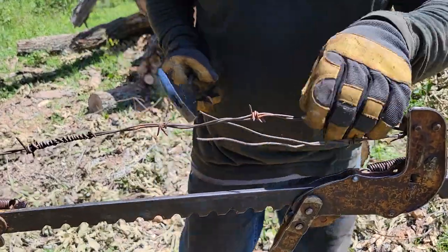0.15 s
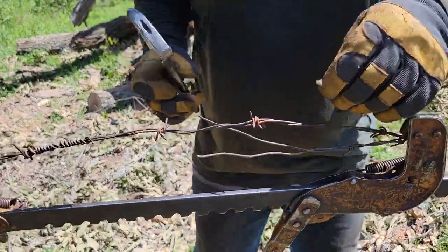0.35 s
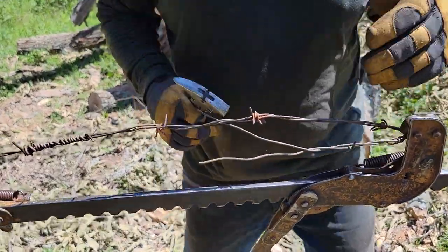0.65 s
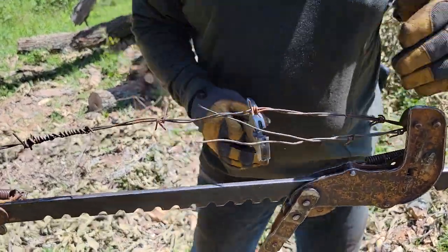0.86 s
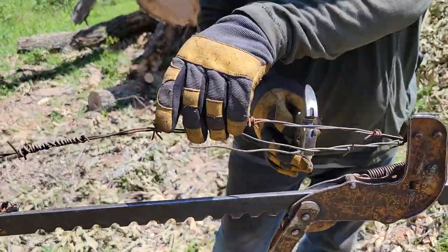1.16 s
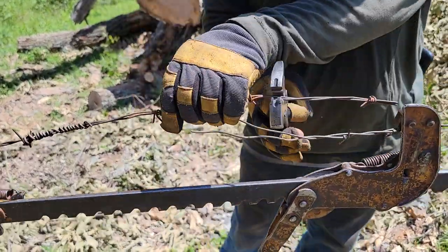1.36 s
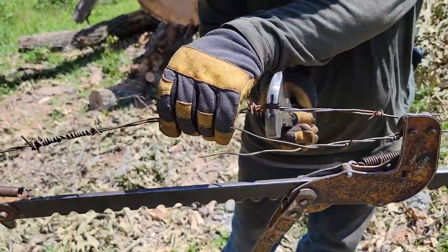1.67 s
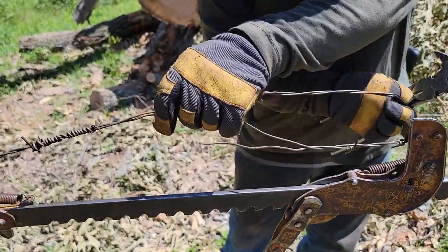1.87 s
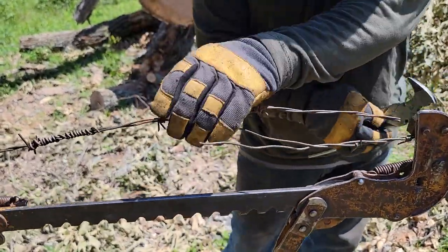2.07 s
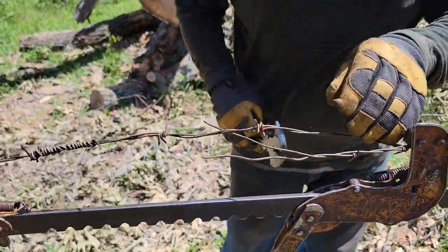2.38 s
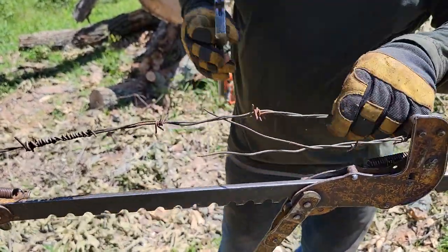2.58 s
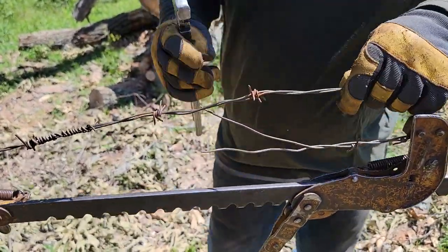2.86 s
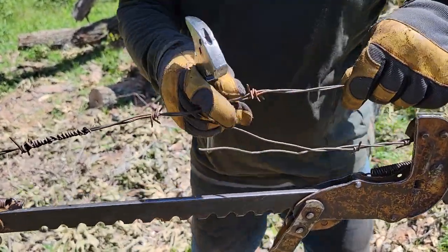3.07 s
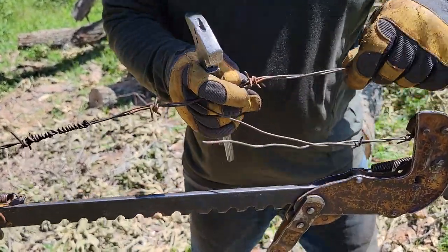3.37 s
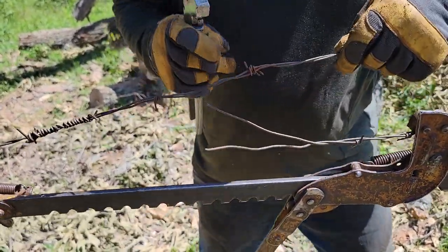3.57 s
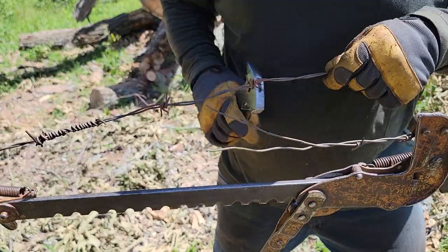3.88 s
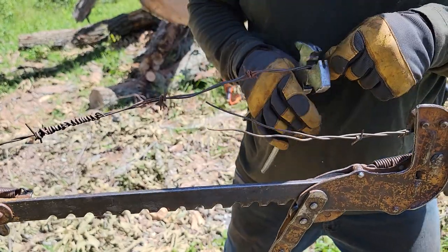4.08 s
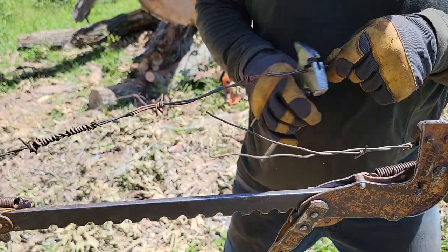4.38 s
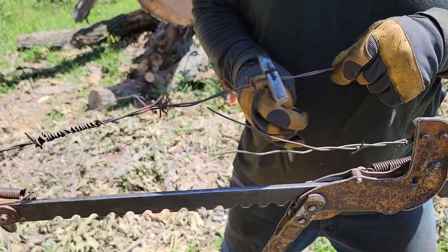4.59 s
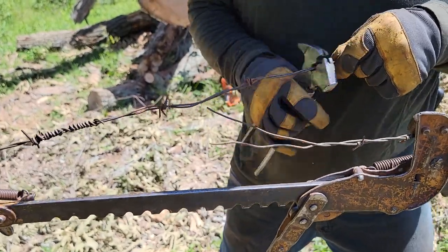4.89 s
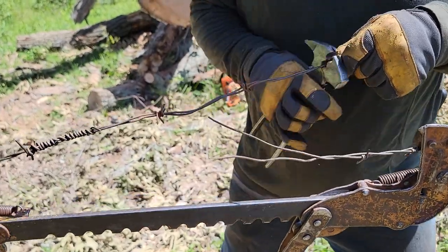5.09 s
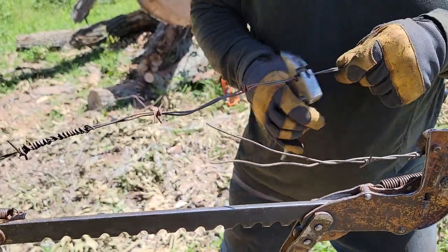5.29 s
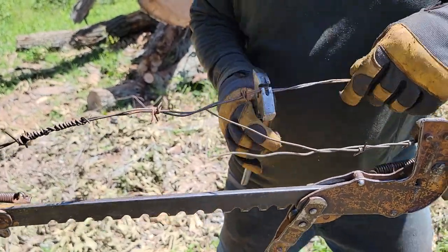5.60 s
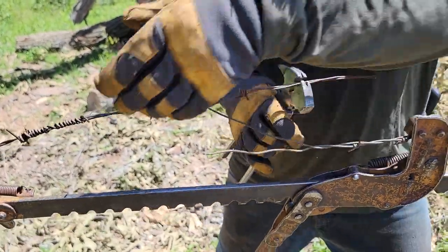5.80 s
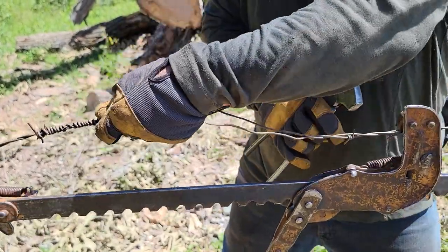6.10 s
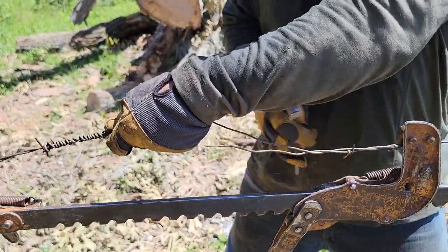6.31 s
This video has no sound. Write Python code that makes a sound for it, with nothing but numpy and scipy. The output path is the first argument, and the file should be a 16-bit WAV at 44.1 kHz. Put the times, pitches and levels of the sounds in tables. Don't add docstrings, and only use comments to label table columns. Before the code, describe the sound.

Wind buffets a phone microphone outdoors while steel pliers clink, click and scrape on barbed wire, building to a run of sharp spaced knocks.

```python
import sys
import numpy as np
from scipy import signal
from scipy.fft import rfft, irfft, next_fast_len
from scipy.io import wavfile

SR = 44100
rng = np.random.default_rng(int(sys.argv[2]) if len(sys.argv) > 2 else 0)


def invert_db(level):
    return 10 ** (np.asarray(level, dtype=float) / 20)


def bounce(signal):
    frames = np.transpose(np.atleast_2d(signal))
    limited = np.clip(frames, -1, 1)
    pcm = np.round(limited * 32767).astype(np.int16)
    wavfile.write(sys.argv[1], SR, pcm)


N = 284445
SIDES = np.array([[1], [-1]])

# time in seconds, rumble level in dB.
BREEZE_DB = [
    (0.0, -33),
    (0.55, -34),
    (0.9, -34),
    (1.35, -33),
    (1.95, -44),
    (3.25, -42.5),
    (4.05, -53),
    (4.7, -45),
    (6.45, -44),
]
# peak in seconds, rumble in dB, fade in seconds per 20 dB, sharpness in dB,
# left minus right in dB.
PUFFS = [(2.05, -31, .14, 1.5, -5), (2.19, -31, .2, 6, -5), (2.6, -34, .22, 1.5, -4),
         (2.82, -35, .12, -1.5, 4), (3.0, -33, .25, -4, 9), (3.87, -43, .2, -3, -1.5),
         (4.21, -42, .15, -4, 7), (4.46, -37, .14, -3, 5), (4.8, -29, .18, 2.5, -1.5),
         (4.99, -34, .13, -1.5, 1.5), (5.06, -32, .11, 1.5, -7), (5.44, -30, .14, 1.5, -3),
         (5.56, -29, .1, 7.5, -3.5), (5.7, -37, .2, 5, -2.5), (5.89, -29, .09, 4, -5),
         (6.0, -27.5, .11, -7, -9), (6.24, -29.5, .2, 2.5, -2.5), (6.44, -29, .14, -6, 1.5)]
# time in seconds, force in dB.
GUST_DB = [
    (0.0, -32),
    (0.07, -28),
    (0.64, -27),
    (0.69, -35),
    (0.79, -29),
    (1.05, -29),
    (1.35, -35),
    (1.65, -40),
    (1.9, -55),
]
# peak in seconds, level in dB.
SLAPS = [
    (.19, -26),
    (.322, -27),
    (.378, -22.5),
    (.5, -29),
    (.62, -31.5),
    (.69, -31),
    (.79, -36),
    (1.126, -36),
    (1.266, -39),
    (1.402, -40.5),
]
# frequency in Hz, density in dB per Hz.
RUMBLE_SPECTRUM = [(12, -40), (20, -16), (48, -1), (70, 4.5), (99, -0.5), (182, -19), (265, -26),
                   (300, -48.5), (390, -40), (660, -120)]
# frequency in Hz, density in dB per Hz.
BUFFET_SPECTRUM = [(59, -28), (100, -9), (151, -2.5), (330, -13), (430, -36.5), (730, -120)]
# frequency in Hz, density in dB per Hz.
WHIP_SPECTRUM = [(160, -24), (280, -2.5), (461, -4), (724, -16), (795, -18.5), (1500, -36), (1800, -42),
                 (2340, -66), (3960, -120)]
# frequency in Hz, density in dB per Hz.
LEAVES_SPECTRUM = [(120, -31), (200, -11), (347, 1), (500, -5), (709, -5), (867, -9), (1140, -10.5),
                   (1560, -12), (4430, -13.5), (6880, -17.5), (10700, -30.5), (15100, -30), (16000, -51)]
# time in seconds, level in dB.
RUB_DB = [(0.0, -52), (0.3, -58), (0.65, -56), (1.49, -59), (1.62, -37), (1.72, -53), (1.88, -39),
          (1.98, -53), (2.1, -59), (4.25, -60), (4.41, -44), (4.56, -44), (4.74, -34.5), (5.2, -38),
          (5.6, -44), (5.8, -54), (6.29, -52), (6.45, -42)]
# frequency in Hz, density in dB per Hz.
GLOVE_SPECTRUM = [(530, -27), (900, -7.5), (1190, -12), (1260, -11), (1900, -6.5), (3100, -5), (5630, -5),
                  (11000, -19.5), (14300, -26), (22000, -120)]
# frequency in Hz, width in Hz, gain in dB.
JAW_MODES = [(1275, 90, 1.5), (1655, 60, 2.5), (3400, 162, 1), (4100, 150, 0.5), (4715, 90, -1.5),
             (5430, 90, -1.5), (6580, 70, -1.5), (6840, 110, 2.5), (7710, 77, -11)]
# start in seconds, peak in dB, handle modes in dB,
# head modes in dB, freedom to ring as a ratio 0-2.
CLINKS = [(.405, -33, 23, -8, 1), (.4229, -25.5, 18, -5, 0.87), (0.4372, -21, 14, -1, 0.88),
          (.7262, -30.5, 3, -9, .6), (1.8053, -7.5, 17, -7, 0.45), (1.8134, -8, 17, -8, 0.55),
          (2.74, -33.5, 9, -6, 0.91), (2.7968, -27.5, 20, 1.5, 1.2), (2.814, -2.5, 7, 5.5, 0.62),
          (2.8294, -17, 10, 2, 0.61), (2.8449, -13, 16, -2, 0.25), (2.8564, -23, 18, -3, 0.5),
          (2.862, -24, 12, -1, .4)]
# frequency in Hz, level in dB, t60 in seconds.
PLIER_MODES = [(1670, -36, 0.082), (3400, -19.5, 0.08), (3530, -13, 0.05), (4450, -25, 0.065),
               (4800, -18, .04), (5430, 2, 0.07), (6100, -9, .06), (6815, -4, 0.06), (7995, 0.5, 0.09),
               (9300, -18, 0.045), (10702, -13, 0.14), (10909, -17, 0.09), (12890, -15, 0.06),
               (14137, -16, .09)]
# start in seconds, hold in seconds, level in dB.
BRUSHES = [
    (.8, .08, -50.5),
    (1.25, .04, -49),
    (1.335, .06, -39.5),
    (1.575, .02, -43),
    (2.31, .04, -47),
    (2.93, .07, -55),
    (3.33, .05, -42.5),
    (3.42, .025, -40),
]
# frequency in Hz, density in dB per Hz.
LEATHER_SPECTRUM = [(500, -20), (1300, -9), (2100, -1), (3000, -3), (5600, -2), (7500, -7), (10000, -15),
                    (12500, -5), (15500, -9), (18000, -60)]
# start in seconds, peak in dB, rebound in seconds, rebound peak in dB,
# edge in dB.
BLOWS = [
    (1.6217, -6.5, 1.6324, -16.5, 1.5),
    (1.8955, -11, 1.908, -17, 5),
    (4.3778, -5, 4.3945, -7, -.6),
    (4.6383, -5, 4.651, -22, 2.5),
    (4.8531, -4.5, 4.863, -8, -1.5),
    (5.0713, -4, 5.0894, -16.5, -1.5),
    (5.2927, -3.5, 5.3025, -8.5, -3),
    (5.521, -6, 5.528, -11.5, -3.5),
    (6.322, -8.5, 6.339, -17, -3),
]
# start in seconds, peak in dB, weight in dB.
TICKS = [(1.481, -35, -6), (1.527, -27.5, -18), (2.745, -33, -20), (4.215, -35, -12), (4.245, -35, -12),
         (1.8045, -14.5, -24.5), (1.9813, -29, -18), (2.328, -29, -21), (3.6237, -41, -17),
         (4.0023, -38, -11.5), (4.563, -20.5, -12), (4.8824, -11.5, -21.5), (5.7159, -30.5, -18),
         (5.7565, -18.5, -30), (5.8405, -31, -16), (6.0327, -39, -16), (6.1662, -20, -15.5)]
# start in seconds, peak in dB, weight in dB.
SKIDS = [(1.6033, -13.5, -16.5), (1.6535, -20.5, -10), (1.3067, -27, -19), (1.7564, -31, -18),
         (1.317, -31, -18), (1.336, -30, -16), (2.3176, -30, -12), (2.4369, -34, -18), (3.4864, -38, -8),
         (4.118, -37, -9.5), (4.179, -32.5, -11), (4.3385, -32, -17), (4.355, -32, -14), (4.537, -33, -14),
         (4.609, -30, -14), (4.99, -27, -14), (5.053, -28, -14), (5.448, -31, -14), (5.506, -25, -12),
         (4.37, -21, -8.5), (4.631, -16, -8), (4.6894, -19.5, -13.5), (4.9581, -22, -11),
         (5.2619, -38, -16), (5.319, -16, -25), (5.382, -22.5, -17), (5.408, -21.5, -13.5),
         (5.494, -28, -11), (5.559, -19.5, -17), (5.6086, -28, -17), (5.913, -34, -19), (6.0577, -26, -13),
         (6.2895, -18.5, -14.5)]
# dull part in dB, bright part in dB, rise in seconds, t60 in seconds.
BLOW_KIND = (-16, -15.5, .0021, .068)
REBOUND_KIND = (-15, -20.5, .0028, .075)
TICK_KIND = (0.1, -24, .002, .062)
SKID_KIND = (0.1, -13.5, .0025, .083)
# frequency in Hz, density in dB per Hz.
SCRAPE_SPECTRUM = [(180, -54), (300, -2), (565, -16.5), (787, -7), (978, -11.5), (1690, -4), (1900, -2.5),
                   (2480, -7.5), (3460, -2.5), (5080, -4), (6740, -4), (9880, -16.5), (12900, 7),
                   (16000, -11.5)]
# start in seconds, peak in dB, pitch in Hz, t60 in seconds.
PINGS = [(1.352, -33, 4450, .07), (1.345, -31, 6100, .03), (2.8162, -9, 4250, .022),
         (2.8165, -9, 5430, .06), (2.823, -20, 9400, .04), (2.8455, -9, 4000, .012),
         (2.851, -22, 4500, .03), (3.338, -35, 2100, .04), (3.416, -33, 2250, .05), (3.36, -36, 5600, .03),
         (1.5274, -28, 4470, 0.05), (1.9804, -28, 6890, 0.045), (2.2777, -34, 6310, 0.05),
         (2.3007, -33, 6900, 0.042), (2.3196, -23.5, 6320, 0.076), (2.3394, -34, 6400, 0.05),
         (2.4369, -29, 6270, 0.068), (2.443, -30, 5300, .05), (4.0018, -35, 3560, 0.078),
         (4.1175, -32, 3620, 0.067), (4.563, -18, 4150, 0.042), (5.3812, -21, 3380, 0.05),
         (5.7164, -32, 3670, 0.05), (5.7578, -23, 3270, 0.036), (5.8421, -32, 4160, 0.05),
         (5.913, -35, 4250, 0.05), (6.0327, -30, 6860, 0.05), (6.1669, -26, 5430, 0.05)]
# start in seconds, peak in
# dB, pitch in Hz, t60 in seconds.
KNOCKS = [(1.482, -29, 1900, .008), (1.657, -11, 2100, 0.007), (1.658, -20, 800, .01),
          (5.553, -15, 120, .035), (1.897, -21, 1670, .02), (3.119, -34, 1800, .015),
          (5.358, -30, 1640, 0.067), (4.537, -33, 900, .012), (6.291, -32, 1000, .015),
          (6.32, -22, 805, .02), (6.322, -19, 1150, .025)]
# start in seconds, peak in dB.
SNAPS = [
    (1.6572, -10.5),
    (4.5635, -24),
    (5.2935, -13),
    (1.6235, -15),
    (5.522, -15),
]
# start in seconds, peak in dB, pitch in Hz.
CHATTER_LOW = [(4.361, -35, 1130), (4.371, -24, 1030), (4.377, -22, 1660), (4.543, -32, 1180),
               (4.562, -36, 1670), (4.634, -22, 1780), (4.691, -30, 1310), (4.778, -32, 1680),
               (4.848, -23, 834), (4.853, -19, 1640), (4.957, -31, 1180), (4.995, -35, 1650),
               (5.053, -42, 751), (5.053, -25, 1330), (5.053, -27, 1280), (5.075, -23, 1690),
               (5.079, -22, 1720), (5.11, -28, 1660), (5.174, -33, 1210), (5.276, -27, 1650),
               (5.292, -24, 1670), (5.409, -33, 770), (5.447, -41, 1660), (5.505, -35, 751),
               (5.506, -29, 1060), (5.521, -27, 1280), (5.61, -38, 1280), (5.757, -37, 1670)]
CHATTER_MID = [(4.3808, -15, 3820), (4.3808, -15, 4400), (4.4771, -36, 3610), (4.5634, -21, 4250),
               (4.6398, -14, 4690), (4.6398, -12, 3500), (4.7965, -31, 3400), (4.8488, -19, 3760),
               (4.8528, -13, 3540), (4.9686, -24, 4240), (5.0369, -29, 4110), (5.0713, -13, 4380),
               (5.0753, -12, 4720), (5.1591, -28, 4160), (5.213, -33, 4480), (5.2619, -31, 3570),
               (5.2928, -8, 3400), (5.3836, -24, 3480), (5.449, -33, 4020), (5.4914, -27, 4380),
               (5.5223, -14, 3330), (5.5278, -12, 3410), (5.6081, -32, 3900), (5.7164, -35, 3570),
               (5.7578, -20, 3330)]
CHATTER_HIGH = [(4.3788, -10, 5630), (4.5629, -27, 6300), (4.6388, -18, 6120), (4.6388, -14, 6710),
                (4.8508, -14, 6160), (4.8548, -8, 5540), (4.9586, -27, 6320), (5.0499, -19, 6970),
                (5.0713, -13, 5420), (5.0758, -11, 6680), (5.224, -29, 6360), (5.2928, -8, 6870),
                (5.3612, -33, 6260), (5.3811, -27, 6190), (5.4475, -33, 5430), (5.5218, -12, 6500),
                (5.7578, -24, 5430), (5.8037, -41, 6600), (5.8426, -34, 6540), (5.9129, -39, 6560),
                (6.0326, -34, 7040), (6.0326, -33, 6840), (6.0586, -33, 7400), (6.1085, -41, 5710)]
CHATTER_T60_S = .03, .022, .018
# frequency in Hz, gain in dB.
INLET_RESPONSE = [(1900, 0.5), (2500, -0.5), (3300, -0.5), (7000, -0.5), (8100, 1), (10300, -3),
                  (11800, 0.5)]
# frequency in Hz, left minus right in dB.
PORT_SHADING = [(60, 17), (110, 13), (200, 19), (380, -9), (700, -19.5), (1290, -5), (2380, -1),
                (4400, -9.5), (8120, -4), (15000, 5.5)]


def unit(x):
    return x / np.sqrt(np.mean(x ** 2))


def on_log_axis(table, hz):
    f, db = np.transpose(table)
    return np.interp(np.log(hz + 1), np.log(f + 1), db)


def colour(x, table, tilt=1):
    hz = np.arange(4097) * SR / 8192
    cepstrum = irfft(np.log(invert_db(tilt * on_log_axis(table, hz))))
    cepstrum[1:4096] *= 2
    cepstrum[4097:] = 0
    impulse = irfft(np.exp(rfft(cepstrum)))[:4096]
    size = next_fast_len(N + 4096)
    return irfft(rfft(x, size) * rfft(impulse, size), size)[:, :N]


def band(x, lo_hz, hi_hz):
    sos = signal.butter(2, [lo_hz, hi_hz], "bandpass", fs=SR, output="sos")
    return signal.sosfilt(sos, x)


def ring(x, hz, width_hz):
    return signal.lfilter(*signal.iirpeak(hz, hz / width_hz, fs=SR), x)


def walk(rate_hz, channels=1):
    knots = rng.standard_normal((channels, 6000))
    position = np.arange(N) * (rate_hz / SR)
    return np.array([np.interp(position, np.arange(6000), row) for row in knots])


def amp_walk(db, rate_hz, channels=1):
    return np.exp(db * np.log(10) / 20 * walk(rate_hz, channels))


def pair(alike, lag_s, grain_db=0):
    left, other = rng.standard_normal((2, N)) * amp_walk(grain_db, 900, channels=2)
    share = np.clip(alike, -1, 1)
    right = np.roll(share * left, int(lag_s * SR)) + np.sqrt(1 - share ** 2) * other
    return unit(np.array([left, right]))


def curves(table, silent_db=None):
    s, *columns = np.transpose(table)
    return np.array([np.interp(np.arange(N) / SR, s, c, silent_db, silent_db) for c in columns])


def swell(s, db, rise_s, fall_s, hold_s=0):
    t = np.arange(N) / SR - s
    away = np.maximum(-t / rise_s, (t - hold_s) / fall_s)
    return db - 20 * np.maximum(away, 0)


def power_sum(gains):
    return np.sqrt(sum(g ** 2 for g in gains))


def notes(table, db_offset):
    out = np.zeros((2, N + SR))
    for s, db, hz, t60_s in table:
        i = int(s * SR)
        t = np.arange(int(abs(t60_s) * SR)) / SR
        envelope = invert_db(db + db_offset - 60 * t / t60_s) * (1 - np.exp(-t / .0003))
        out[:, i:i + len(t)] += envelope * np.sin(2 * np.pi * hz * (t + .00005 * SIDES))
    return out[:, :N]


def buffet_level(rumble_db):
    return -46 + 1.3 * (rumble_db + 35)


def wind():
    breeze_db, gust_db = curves(BREEZE_DB)[0], curves(GUST_DB, -99)[0]
    push = [invert_db(breeze_db)]
    shake = [invert_db(buffet_level(breeze_db)), invert_db(gust_db)]
    for s, db, fade_s, sharp_db, pan_db in PUFFS:
        puff_db = swell(s, db, fade_s, fade_s)
        side_db = pan_db * SIDES / 2
        push.append(invert_db(puff_db) * invert_db(side_db))
        shake.append(invert_db(buffet_level(puff_db)) * invert_db(sharp_db + side_db))
    lash = [invert_db(gust_db - 5 - 8 * np.arange(N) / SR)]
    lash += [invert_db(swell(s, db, rise_s=.06, fall_s=.06)) for s, db in SLAPS]

    pressure = unit(colour(pair(alike=-0.041, lag_s=0), RUMBLE_SPECTRUM))
    rumble = pressure * power_sum(push) * invert_db(3.0) * amp_walk(2.5, 12, channels=2)
    eddies = pair(alike=-0.55, lag_s=0) * amp_walk(3.4, 90)
    shaking = unit(colour(eddies + .3 * eddies.sum(axis=0), BUFFET_SPECTRUM))
    whip = unit(colour(eddies, WHIP_SPECTRUM))
    return rumble + shaking * power_sum(shake) * invert_db(2.5) + whip * power_sum(lash) * invert_db(7.0)


def leaves():
    hiss = unit(colour(pair(alike=0.033, lag_s=0), LEAVES_SPECTRUM))
    return hiss * invert_db(-49) * amp_walk(0.95, 3.045, channels=2)


def rubbing():
    rub_db = curves(RUB_DB)[0]
    sizzle = invert_db(-50 + 1.2 * (rub_db + 40))
    snag_size = invert_db(13.5 + 3.7 * np.minimum(rng.exponential(size=N), 2.5))
    snags = (rng.random(N) < 400 / SR) * snag_size
    grains = pair(alike=0.33, lag_s=.00015, grain_db=1.0) + np.array([snags, np.roll(snags, 5)])
    wire = colour(grains, GLOVE_SPECTRUM)
    registers_hz = (800, 1350, 2300, 3900, 6600, 11000)
    patches = unit(sum(band(wire, hz / 1.3, hz * 1.3) * amp_walk(2.2, 50) for hz in registers_hz))
    top = unit(band(grains, 12400, 19800))
    return amp_walk(2.8, 40) * (invert_db(rub_db - .7) * patches + invert_db(2.1) * sizzle * top)


def jaw_ringing(hits, rub):
    drive = invert_db(-3.5) * hits + invert_db(2.5) * rub
    return sum(invert_db(db) * ring(drive * amp_walk(4.0, 30), hz, width_hz) for hz, width_hz, db in JAW_MODES)


def grit(count=500):
    when, which = rng.random((count, 2)).T
    detune, size = rng.standard_normal((count, 2)).T
    s = when * (N / SR)
    mode_hz = np.array(JAW_MODES)[(which * len(JAW_MODES)).astype(int), 0]
    hz = mode_hz * (1 + .05 * detune)
    db = np.interp(s, *np.transpose(RUB_DB)) + 3.5 * size
    return notes(zip(s, db, hz, np.full(count, .022)), db_offset=2.5)


def clinks():
    out = np.zeros((2, N))
    hz, mode_db, t60_s = (c[:, None] for c in np.transpose(PLIER_MODES))
    t = np.arange(SR // 8) / SR
    chance = rng.standard_normal((len(CLINKS), 3, 2, len(PLIER_MODES), 1))
    cracks = band(rng.standard_normal((len(CLINKS), 2, len(t))), 3100, 9400) * invert_db(-60 * t / 0.036)
    for row, (size, phase, detune), crack in zip(CLINKS, chance, cracks):
        s, db, handle_db, head_db, free = row
        turn = 2 * phase[0] + 1.3 * detune[1] * SIDES[:, None]
        tones = np.sin(2 * np.pi * hz * (1 + 0.0015 * detune[0]) * t + turn)
        share_db = mode_db + handle_db * (hz < 4500) + head_db * (hz > 7500) + 2.7 * size
        decay_s = np.clip(np.where(hz > 10000, .7, free) * t60_s, .01, .15)
        steel = np.sum(invert_db(share_db - 60 * t / decay_s) * tones, axis=1)
        knock = invert_db(-7.5) * steel + invert_db(-6 + .3 * head_db) * crack
        i = int(s * SR)
        out[:, i:i + len(t)] += invert_db(db) * (1 - np.exp(-t / 0.00033)) * knock
    return out * amp_walk(2.6, 250)


def brushing():
    level = sum(invert_db(swell(s, db, rise_s=.09, fall_s=.07, hold_s=hold_s)) for s, hold_s, db in BRUSHES)
    grains = pair(alike=.4, lag_s=.00012, grain_db=4.0)
    return level * amp_walk(3.0, 90) * unit(colour(grains, LEATHER_SPECTRUM))


def contacts():
    rows = []
    for s, db, again_s, again_db, edge_db in BLOWS:
        for when_s, peak_db, kind in ((s, db, BLOW_KIND), (again_s, again_db, REBOUND_KIND)):
            dull_db, bright_db, *times_s = kind
            rows.append((when_s, peak_db, dull_db, bright_db + edge_db, *times_s))
    for table, (dull_db, *rest) in ((TICKS, TICK_KIND), (SKIDS, SKID_KIND)):
        rows += [(s, db, dull_db + weight_db, *rest) for s, db, weight_db in table]
    return rows


def scrapes():
    slips = pair(alike=0.45, lag_s=.00012, grain_db=3.5)
    power = np.zeros((3, N + SR))
    t = np.arange(-SR // 50, SR // 6) / SR
    for s, db, dull_db, bright_db, rise_s, t60_s in contacts():
        i = int((s + .0015 + t[0]) * SR)
        fade = np.where(t < 0, np.exp(t / max(rise_s, .0001)), invert_db(-60 * t / max(t60_s, .01)))
        part_db = db + np.array([[dull_db], [0], [bright_db]])
        power[:, i:i + len(t)] += (invert_db(part_db) * fade) ** 2
    dull, body, bright = np.sqrt(power[:, :N])
    wire = colour(slips, SCRAPE_SPECTRUM)
    low = invert_db(-6.5) * dull * unit(band(wire, 400, 2320))
    middle = invert_db(-8.5) * body * unit(band(band(wire, 2700, 7600), 2600, 8000))
    high = invert_db(4.0) * bright * unit(band(band(slips, 9900, 18000), 8200, 22000))
    return low + middle + high


def pings():
    return notes(PINGS, db_offset=-4.5)


def knocks():
    return notes(KNOCKS, db_offset=-2.5)


def snaps():
    push = np.zeros(N)
    t = np.arange(SR // 100) / SR
    for (s, db), noise in zip(SNAPS, rng.standard_normal((len(SNAPS), len(t)))):
        i = int(s * SR)
        push[i:i + len(t)] += invert_db(db + 3.5 - 60 * t / .006) * noise
    return band(np.array([push, np.roll(push, 4)]), 600, 4500)


def chatter():
    rows = []
    for table, t60_s in zip((CHATTER_LOW, CHATTER_MID, CHATTER_HIGH), CHATTER_T60_S):
        rows += [(*row, t60_s) for row in table]
    return notes(rows, db_offset=-4.5)


def scene():
    hits, rub = scrapes(), rubbing()
    contact = hits + rub + jaw_ringing(hits, rub) + brushing() + snaps()
    hands = colour(contact, INLET_RESPONSE)
    hands = hands + grit() + chatter() + clinks() + pings() + knocks()
    left = colour(hands[:1], PORT_SHADING, tilt=0.4)
    right = colour(hands[1:], PORT_SHADING, tilt=-0.35)
    return np.vstack([left, right]) + wind() + leaves()


def roll_off(x):
    return signal.sosfilt(signal.butter(12, 16470, fs=SR, output="sos"), x)


def record(dry):
    cut = signal.ellip(8, .2, 60, 15900, fs=SR, output="sos")
    mix = signal.sosfilt(cut, np.clip(dry, -1, 1))
    return roll_off(mix)


dry = scene()
out = record(dry)
bounce(out)
```